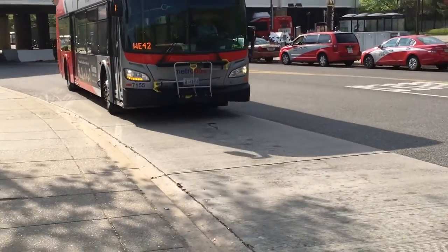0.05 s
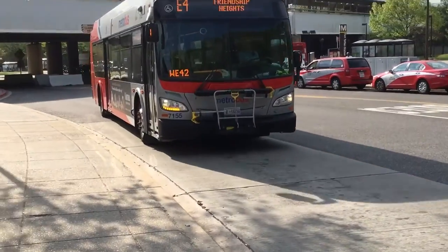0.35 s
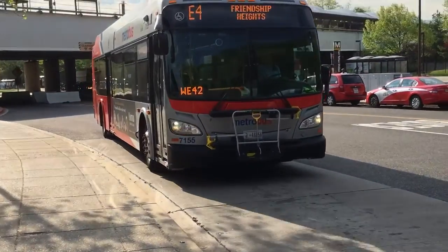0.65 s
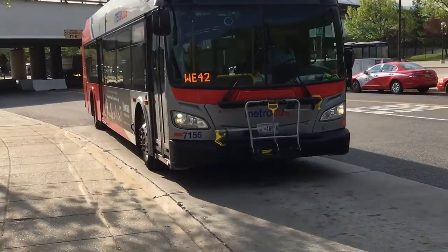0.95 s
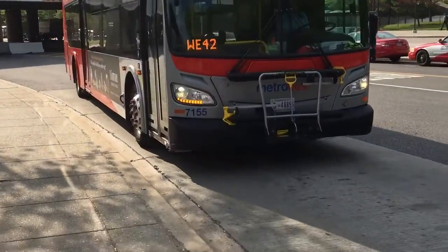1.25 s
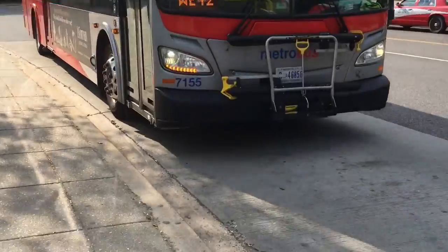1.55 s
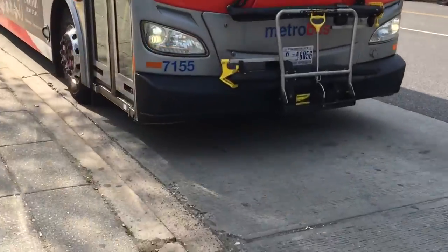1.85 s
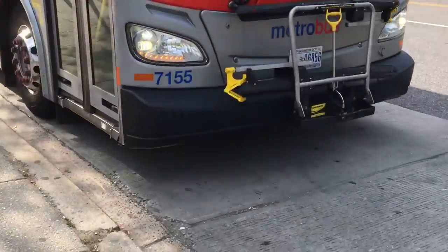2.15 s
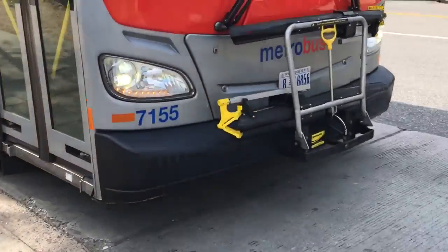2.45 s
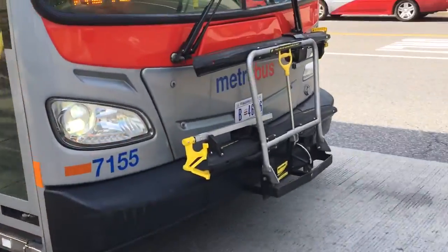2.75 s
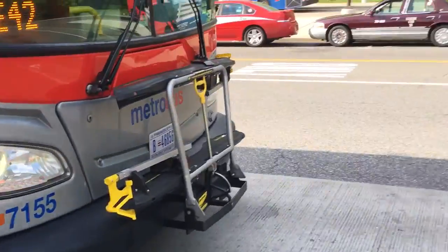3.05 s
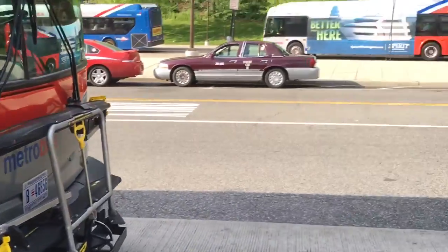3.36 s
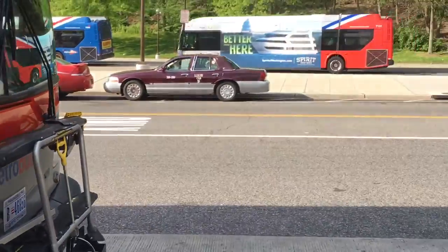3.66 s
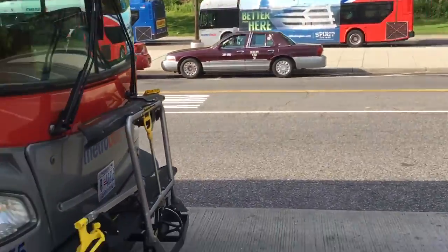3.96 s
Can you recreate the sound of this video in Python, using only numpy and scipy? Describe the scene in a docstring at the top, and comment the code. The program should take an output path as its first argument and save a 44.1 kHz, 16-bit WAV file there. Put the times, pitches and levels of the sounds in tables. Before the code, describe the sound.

A bus engine rumbles as it pulls up, then the air brakes pop and hiss.

```python
"""A city bus engine drones at a steady firing rate over exhaust rumble as the bus rolls up to the kerb.
Tyre, body and street noise grows as it nears. The turbo winds down, small metal parts jingle
and a brake pad sings thinly. Then an air valve pops open and the brakes vent with a long hiss
that fades and dulls as the pressure falls."""
import sys
import numpy as np
from scipy import signal
from scipy.fft import rfft, irfft
from scipy.io import wavfile
from scipy.ndimage import uniform_filter1d

SR = 44100
rng = np.random.default_rng(int(sys.argv[2]) if len(sys.argv) > 2 else 0)


def persist_wave(psi):
    """Save psi, clipped to +-1, as 16-bit WAV."""
    counts = np.round(np.clip(psi, -1, 1) * 32767).astype(np.int16)
    wavfile.write(sys.argv[1], SR, np.atleast_2d(counts).T)


N = 176400
TIME = np.arange(N) / SR

# tyre, body and street spectra, far and near: (frequency [Hz], relative density [dB])
ROAR_FAR = [(100, -38), (170, 2.5), (180, -8), (222, 0.5), (243, -13), (283, -7.5), (342, -13), (398, -7.5),
            (463, -15.5), (603, -14), (689, -15.5), (848, -14.5), (932, -17), (1290, -19), (1390, -23),
            (1950, -24.5), (2790, -31.5), (3250, -34.5), (3500, -33), (4070, -33), (5020, -37.5),
            (5840, -37), (7600, -43), (9910, -44.5), (15600, -55)]
ROAR_NEAR = [(100, -36), (170, -1), (180, 0), (209, -5), (289, -1), (330, -1.5), (362, -1), (391, -5.5),
             (490, -9), (615, -5.5), (772, -9), (1110, -9), (1310, -15), (1410, -13), (2270, -16.5),
             (3010, -25.5), (3310, -24), (4920, -38), (5510, -30), (6660, -34), (7190, -37), (9360, -35.5),
             (10500, -42.5), (11500, -39), (15600, -45.5)]
# roar bands: (time [s], low level [dB], mid level [dB], treble level [dB])
ROAR_LEVELS = [(0, -40.5, -42, -55.5), (.7, -40, -42, -55), (1.3, -41, -41, -54), (2, -40.5, -41.5, -54.5),
               (2.35, -39, -41, -53.5), (2.7, -38, -41, -52), (3, -39, -40, -53), (3.45, -37, -40.5, -49.5),
               (4, -40.5, -40.5, -50)]
# turbo whistle: (time [s], frequency [Hz], level [dB])
TURBO_GLIDE = [(0, 4450, -79), (.7, 4070, -67), (1.05, 3850, -66.5), (1.45, 3670, -61), (1.85, 3470, -63.5),
               (2.2, 3335, -63.5), (2.6, 3250, -62), (3, 3210, -63), (4, 3200, -66)]
# drivetrain and body whines: (peak time [s], sigma [s], frequency [Hz], width [Hz], level [dB])
WHINES = [(2.23, 0.46, 690, 26, -49), (3.7, 0.72, 1150, 68, -51), (.3, .8, 3265, 94, -63.5),
          (1.5, .8, 9950, 200, -73), (3.15, 0.063, 4280, 55, -64), (1.95, .06, 9300, 120, -66)]
# fine jingling: (frequency [Hz], relative density [dB])
JINGLE_SPECTRUM = [(3000, -30), (4800, -8), (5500, 8), (6500, 0), (7500, -5), (8700, 0), (10500, -5),
                   (12500, -3), (15500, -9)]
# metal impacts: (time [s], relative level [dB], pitch [Hz])
CLINKS = [(.425, -50, 8900), (.494, -40.5, 5330), (.523, -48, 5350), (.788, -44, 5340), (.81, -48, 8600),
          (.8387, -40.5, 8550), (.8806, -39, 5520), (.9081, -45, 6150), (.9565, -45, 6300),
          (.995, -49, 8700), (1.0148, -44, 5330), (1.0393, -48, 8400), (1.0572, -44, 8700)]
# modes of one clink: (ratio to pitch, relative level [dB])
CLINK_MODES = [(1, -2), (1.02, -6), (1.08, -2.5), (1.46, -13), (1.7, -15)]
# valve pop, jet hiss and jet body: (frequency [Hz], relative density [dB])
POP_SPECTRUM = [(200, -30), (620, -12), (800, -1), (1020, 0.5), (1250, -2), (1570, 4.5), (1850, -10),
                (2150, -6), (2400, -8), (2950, -10), (3150, 3), (3350, -1), (3600, -13), (3850, -5),
                (4150, -2), (5200, -9), (5950, -7), (7710, -12), (9550, -8), (10500, -21), (12800, -16),
                (15600, -24)]
JET_SPECTRUM = [(1650, -38), (2800, -3), (2940, -16), (3120, -7), (3210, -3), (3710, -7), (4250, -2),
                (4800, -11), (5420, -0.5), (6540, -3), (7080, 0.5), (7280, -2.5), (8230, -4.5), (8910, -4),
                (9640, -3.5), (10300, -10), (11100, -5), (12100, -8), (13100, -8), (15000, -13),
                (15600, -9.5)]
JET_BODY_SPECTRUM = [(300, -30), (700, -4), (850, -8), (1150, 4), (1330, -11), (1550, -4), (1780, -15),
                     (2240, 6), (2500, -14), (2900, -11), (4000, -45)]
# air port resonances: (frequency [Hz], width [Hz], level re jet [dB])
PORT_MODES = [(2324, 290, -19), (3260, 150, -15), (8300, 260, -15), (13100, 140, -20)]
# exhaust rumble and its surge: (frequency [Hz], relative density [dB])
RUMBLE_SPECTRUM = [(10, -22), (25, -18), (36, -17), (46, -2), (56, -4), (72, 1.5), (88, -4), (110, -3.5),
                   (135, -7.5), (155, -11.5), (180, -26), (260, -40), (600, -75)]
SURGE_SPECTRUM = [(15, -22), (40, -7), (60, 4), (80, 2), (120, -6), (180, -14.5), (400, -42), (1500, -100)]
# exhaust rumble: (time [s], level [dB])
RUMBLE_LEVELS = [(0, -35), (.45, -39), (.65, -32.5), (1.2, -33.5), (1.8, -32.5), (2.8, -31), (3.6, -33.5),
                 (4, -27.5)]
# firing harmonics: (time [s], first [dB], second [dB], third [dB])
HARMONIC_LEVELS = [(0, -30, -25, -37.5), (.8, -33, -26, -36.5), (1.2, -28, -27.5, -38),
                   (1.43, -28, -30, -35), (1.7, -29.5, -27, -35.5), (2.35, -36.5, -26, -40.5),
                   (2.9, -29.5, -24.5, -42), (3.4, -31.5, -26, -43), (4, -30.5, -27, -36.5)]
# weaker engine tones: (frequency [Hz], start level [dB], end level [dB])
SIDE_TONES = [(68.3, -52, -34), (74.5, -43, -47), (144.8, -62, -40), (217.3, -53.5, -48.5),
              (242.4, -59, -49), (267.3, -62.5, -47.5), (287.7, -56, -52), (367, -57.5, -52.5)]


def amp(db):
    """Decibels to gain."""
    return 10 ** (np.asarray(db) / 20)


def unit(x):
    """Scale to rms 1."""
    return x / np.sqrt(np.mean(x ** 2) + 1e-20)


def curves(table):
    """Per-sample linear interpolation of each column against the first."""
    times_s, *columns = np.transpose(table)
    return [np.interp(TIME, times_s, column) for column in columns]


def swell(peak_s, sigma_s):
    """Gaussian envelope, peak 1."""
    return np.exp(-.5 * ((TIME - peak_s) / sigma_s) ** 2)


def noise(spectrum):
    """Noise of a given spectrum, rms 1."""
    hz, db = np.transpose(spectrum)
    bins_hz = np.fft.rfftfreq(N, 1 / SR)
    gain = amp(np.interp(np.log(bins_hz + 1), np.log(hz), db))
    return unit(irfft(rfft(rng.standard_normal(N)) * gain, N))


def lowpass(x, hz):
    """Steep zero-phase low-pass."""
    return irfft(rfft(x) / (1 + (np.fft.rfftfreq(N, 1 / SR) / hz) ** 8), N)


def wander(rate_hz):
    """Slow random signal, rms 1."""
    return unit(lowpass(rng.standard_normal(N), rate_hz))


def whistle(hz, width_hz):
    """Narrow noise band following a pitch."""
    phase = 2 * np.pi * np.cumsum(hz * np.ones(N)) / SR
    return wander(width_hz / 2) * np.cos(phase) + wander(width_hz / 2) * np.sin(phase)


def turbulent(x, depth_db):
    """Narrow bands swell and fade at random; output rms 1."""
    bands = signal.stft(x, nperseg=1024, noverlap=768)[2]
    patches = uniform_filter1d(rng.standard_normal(bands.shape), size=4, axis=0)
    patches = unit(uniform_filter1d(patches, size=14, axis=1))
    bands *= amp(depth_db * patches)
    return unit(signal.istft(bands, nperseg=1024, noverlap=768)[1][:N])


def roar(firing_cycles, low_split_hz=549, high_split_hz=3000, knock_depth=.05):
    """Tyre, body and street noise swells as the bus nears; mids pulse faintly at half the firing rate."""
    nearness = TIME / TIME[-1]
    wash = np.sqrt(1 - nearness) * noise(ROAR_FAR) + np.sqrt(nearness) * noise(ROAR_NEAR)
    wash = turbulent(wash, depth_db=1.36)
    low, low_and_mid = lowpass(wash, low_split_hz), lowpass(wash, high_split_hz)
    low_db, mid_db, treble_db = curves(ROAR_LEVELS)
    knock = 1 + knock_depth * np.cos(np.pi * firing_cycles)
    return (unit(low) * amp(low_db + .48 * wander(20))
            + unit(low_and_mid - low) * amp(mid_db + .83 * wander(24)) * knock
            + unit(wash - low_and_mid) * amp(treble_db + .56 * wander(25)))


def turbo():
    """The turbocharger's whistle falls as it winds down."""
    hz, db = curves(TURBO_GLIDE)
    return amp(db) * whistle(hz, width_hz=49)


def whines():
    """Narrow drivetrain and body whines swell and pass."""
    return sum(amp(db) * swell(peak_s, sigma_s) * whistle(hz, width_hz)
               for peak_s, sigma_s, hz, width_hz, db in WHINES)


def jingle(flurry_db=-55, t60_s=.056, tick_relative_db=-10, tick_decay_s=.006):
    """Small metal parts tick and ring amid a flurry of finer touches."""
    out = noise(JINGLE_SPECTRUM) * amp(flurry_db + 1.8 * wander(70)) * swell(peak_s=.98, sigma_s=.085)
    age_s = TIME[:SR // 5]
    decay = amp(-60 * age_s / t60_s)
    for start_s, db, hz in CLINKS:
        ring = sum(amp(mode_db) * np.sin(2 * np.pi * (hz * ratio * age_s + rng.random()))
                   for ratio, mode_db in CLINK_MODES)
        tick = amp(tick_relative_db) * rng.standard_normal(len(age_s)) * np.exp(-age_s / tick_decay_s)
        out[round(start_s * SR):][:len(age_s)] += amp(db) * (ring * decay + tick) / 2
    return out


def brake_squeal(start_s=2.72, end_s=3.07, attack_s=.015, release_s=.05):
    """A brake pad sings one thin, wavering note that starts firmly and fades."""
    start_hz, rise_hz_per_s, waver_hz = 6850, 85, 14
    start_db, fall_db_per_s = -59.5, 5
    age_s = TIME - start_s
    hz = start_hz + rise_hz_per_s * age_s + waver_hz * wander(60)
    gate = np.clip(np.minimum(age_s / attack_s, (end_s - TIME) / release_s), 0, 1)
    rms = amp(start_db - fall_db_per_s * age_s + 2.7 * wander(30))
    return gate * rms * np.sqrt(2) * np.sin(2 * np.pi * np.cumsum(hz) / SR)


def valve_pop(age_s, level_db=-20, hold_s=.0032, decay_s=.0019, tail_relative_db=-8.5, tail_s=.016):
    """The opening valve gives a short burst with a weaker tail."""
    burst = np.exp(-np.maximum(age_s - hold_s, 0) / decay_s) * noise(POP_SPECTRUM)
    tail = amp(tail_relative_db) * np.exp(-age_s / tail_s) * noise(POP_SPECTRUM)
    return amp(level_db) * (burst + tail)


def air_jet(age_s, start_share=.48, rise_s=.038, hold_s=.15):
    """The jet builds, rings in its port, then fades and dulls as the pressure falls."""
    hiss_db, hiss_fall_db_per_s = -37, 22
    body_db, body_fall_db_per_s = -45.5, 25
    top_hz, top_relative_db, top_fall_db_per_s = 10200, -.5, 12
    flow = (1 - (1 - start_share) * np.exp(-age_s / rise_s)) * amp(.5 * wander(50))
    falling_s = np.maximum(age_s - hold_s, 0)
    hiss = turbulent(noise(JET_SPECTRUM), depth_db=1.2)
    hiss += sum(amp(db) * whistle(hz, width_hz) for hz, width_hz, db in PORT_MODES)
    dull = lowpass(hiss, top_hz)
    top = (hiss - dull) * amp(top_relative_db - top_fall_db_per_s * falling_s)
    hiss = (dull + top) * amp(hiss_db - hiss_fall_db_per_s * falling_s)
    body = noise(JET_BODY_SPECTRUM) * amp(body_db - body_fall_db_per_s * falling_s)
    return flow * (hiss + body)


def air_release(start_s=3.601, opening_s=.00033):
    """The air brakes vent through a valve: pop, then hiss."""
    age_s = np.maximum(TIME - start_s, 0)
    opened = np.minimum(age_s / opening_s, 1)
    return opened * (valve_pop(age_s) + air_jet(age_s))


def exhaust(surge_db=-29):
    """Low exhaust rumble with one surge."""
    surge = amp(surge_db) * swell(peak_s=1.41, sigma_s=.12) * noise(SURGE_SPECTRUM)
    rumble_db, = curves(RUMBLE_LEVELS)
    return amp(rumble_db) * noise(RUMBLE_SPECTRUM) + surge


def engine(firing_cycles, flutter_db=.56, drift_hz=.79):
    """Three firing harmonics drone over weaker, drifting tones."""
    drone = np.zeros(N)
    for harmonic, db in enumerate(curves(HARMONIC_LEVELS), 1):
        rms = amp(db + flutter_db * wander(14))
        drone += rms * np.sqrt(2) * np.sin(2 * np.pi * (harmonic * firing_cycles + rng.random()))
    for hz, start_db, end_db in SIDE_TONES:
        cycles = np.cumsum(hz + drift_hz * wander(2.93)) / SR + rng.random()
        rms = amp(np.linspace(start_db, end_db, N) + 2.5 * wander(3.9))
        drone += rms * np.sqrt(2) * np.sin(2 * np.pi * cycles)
    return drone


def scene(firing_hz=50.02, wobble_cycles=.007):
    """The bus from the pavement, mono."""
    firing_cycles = firing_hz * TIME + wobble_cycles * wander(9.7)
    running = engine(firing_cycles) + exhaust() + roar(firing_cycles) + turbo() + whines()
    return (running + jingle() + brake_squeal() + air_release())[None]


def record(dry):
    """Band limit."""
    cutoff_hz = 15800
    taps = signal.firwin(511, cutoff_hz, window=("kaiser", 9), fs=SR)
    return signal.oaconvolve(dry, taps[None], "same")


dry = scene()
out = record(dry)
persist_wave(out)
```